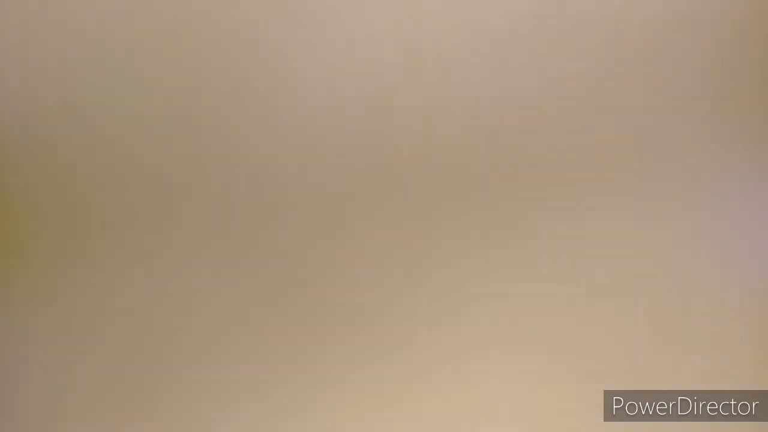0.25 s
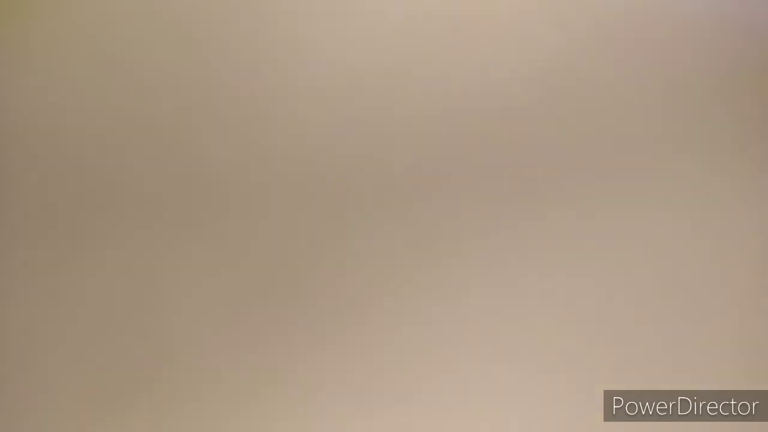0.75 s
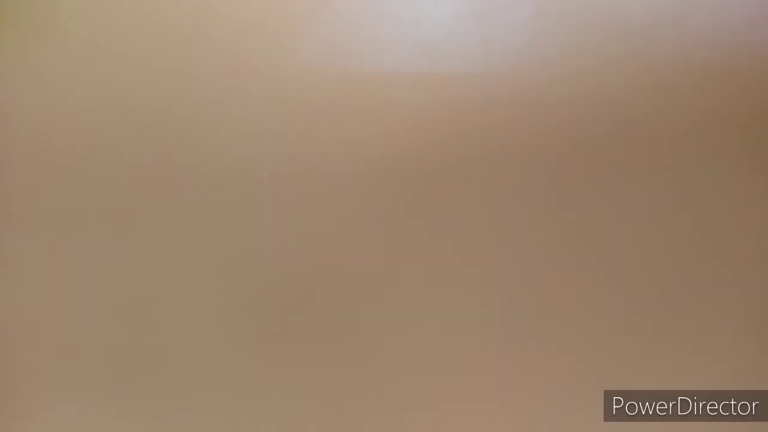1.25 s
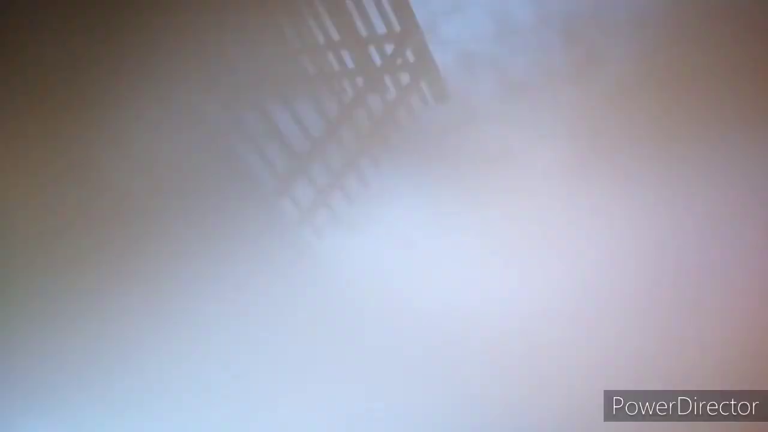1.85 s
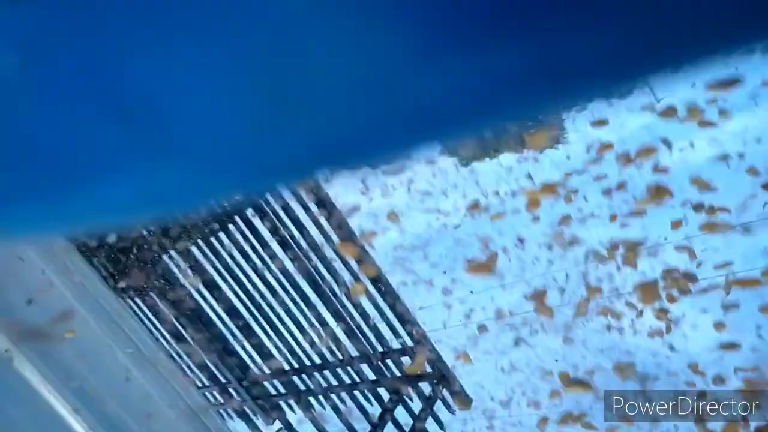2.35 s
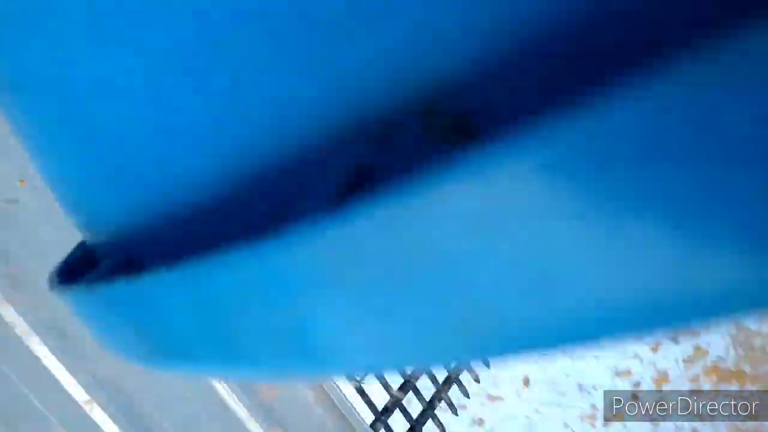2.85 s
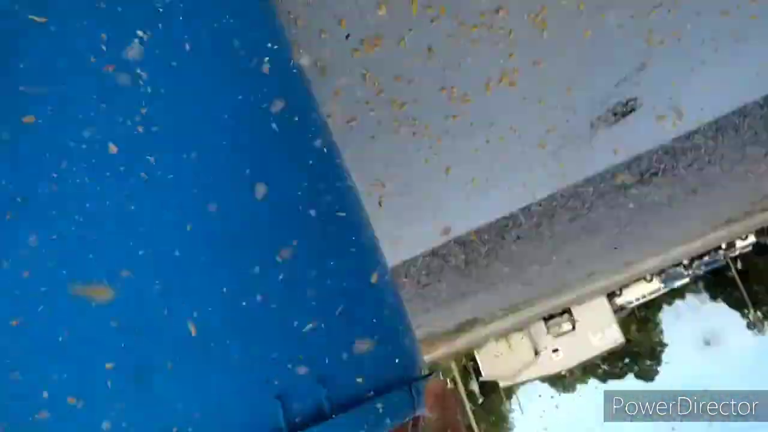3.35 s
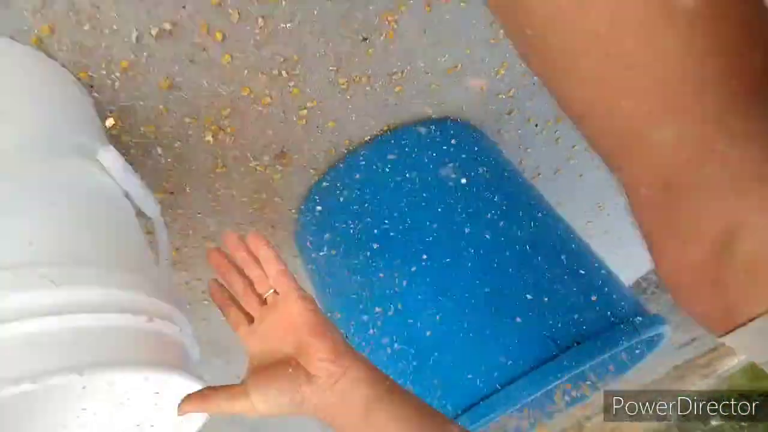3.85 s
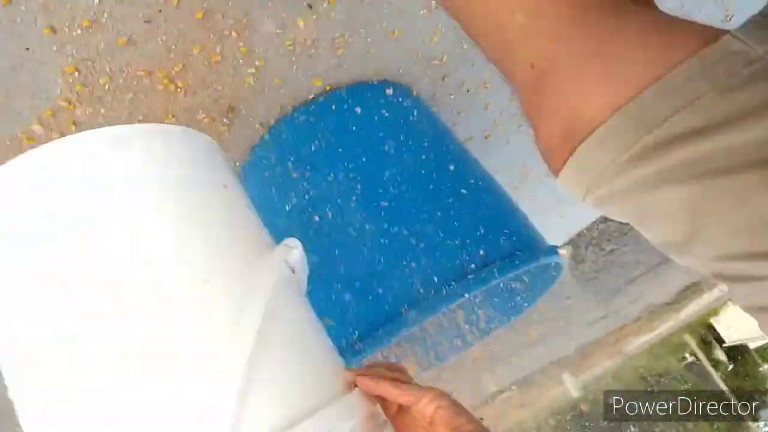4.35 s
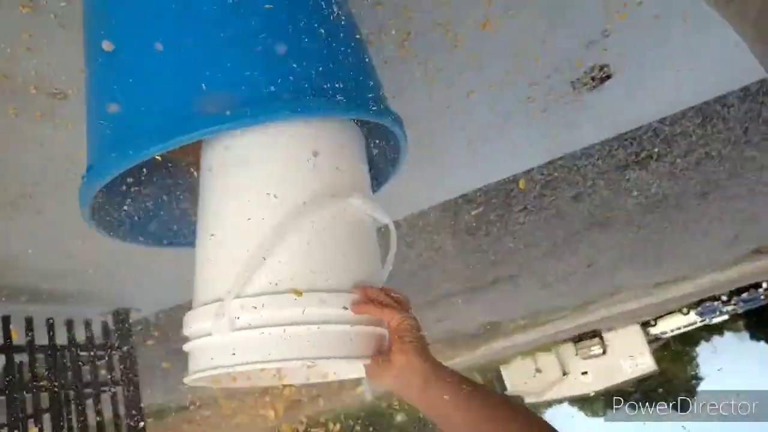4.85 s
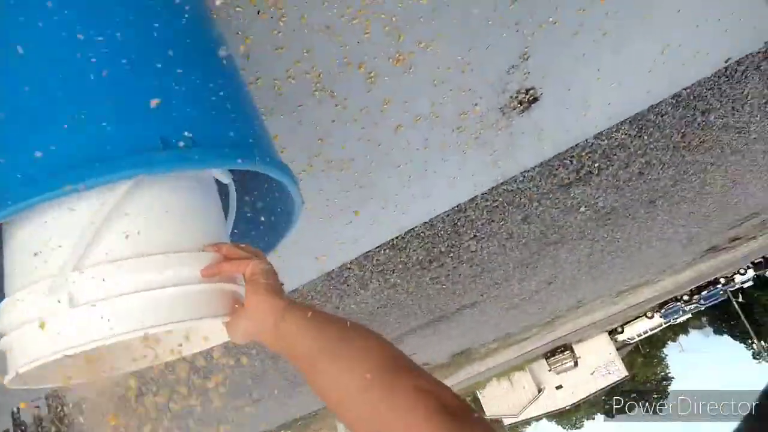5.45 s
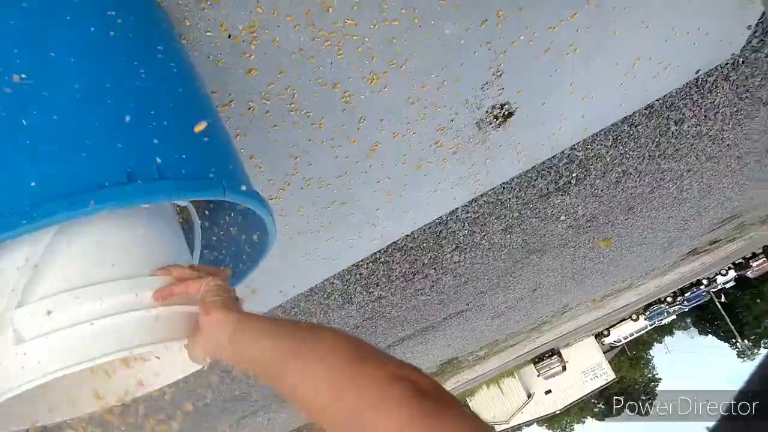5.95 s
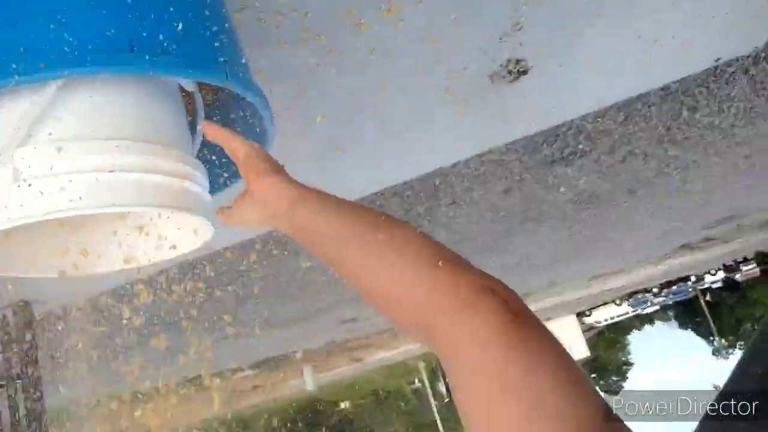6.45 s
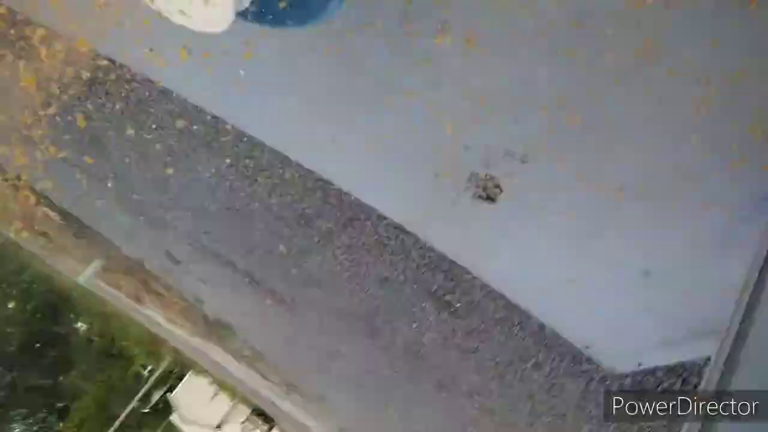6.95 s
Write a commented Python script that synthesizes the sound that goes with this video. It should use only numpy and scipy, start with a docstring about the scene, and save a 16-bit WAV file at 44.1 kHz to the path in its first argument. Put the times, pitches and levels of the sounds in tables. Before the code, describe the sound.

Close outdoor stream of hard kernels clattering on plastic, with sharp pings and handling bumps, then a booming bucket catching the flow and crackling brightly.

```python
"""Corn kernels stream from a chute onto a plastic tub, the concrete and then into a bucket held in the stream:
random clicks ring the modes of what they strike, single near kernels ping. The bucket booms, rings and ticks.
A handheld two-port recorder is turned about close by, so modes, balance and lag change with each pose.
Fingers bump its case (short low cycles); far off a motor hums (wavering sine) over yard rumble (banded noise)."""
import sys
import numpy as np
from scipy import signal
from scipy.io import wavfile

SR = 44100
rng = np.random.default_rng(int(sys.argv[2]) if len(sys.argv) > 2 else 0)


def generate_wav(sig):
    """Save sig (samples, or channels by samples) to the path in sys.argv[1] as 16-bit PCM at SR."""
    pcm = np.round(np.clip(np.atleast_2d(sig).T, -1, 1) * 32767).astype(np.int16)
    wavfile.write(sys.argv[1], SR, pcm)


N = 317077

# middles of the turns from pose to pose: (time [s])
TURNS_S = [1.47, 2.25, 3.27, 4.82]
TURN_LENGTH_S = 0.1


def from_db(db):
    """Gain of a level in dB."""
    return 10 ** (np.asarray(db) / 20)


def mid_one(x):
    """Scales so that the mean of both sides has rms 1."""
    mid = np.mean(x, axis=0)
    return x / np.sqrt(np.mean(mid ** 2) + 1e-20)


def in_time(rows):
    """Each column of a curve at every sample."""
    times_s, *columns = np.transpose(rows)
    t = np.arange(N) / SR
    return [np.interp(t, times_s, column) for column in columns]


def sides(pan_db):
    """Gains of left and right for a level difference, left minus right."""
    return from_db(np.array([pan_db / 2, -pan_db / 2])).reshape(2, -1)


def drift(rate_hz):
    """Slow noise of spread 1: two equal low-pass poles at rate_hz, run at SR / 20 and interpolated."""
    step, settle = 20, 4000
    r = np.exp(-2 * np.pi * rate_hz * step / SR)
    white = rng.standard_normal(N // step + settle + 2)
    slow = signal.lfilter([1], [1, -2 * r, r * r], white)[settle:]
    return np.interp(np.arange(N) / step, np.arange(len(slow)), slow / slow.std())


def resonance(x, hz, width_hz):
    """Two-pole peak of gain 1."""
    r = np.exp(-np.pi * width_hz / SR)
    zeros = np.array([1, 0, -1]) * (1 - r * r) / 2
    poles = [1, -2 * r * np.cos(2 * np.pi * hz / SR), r * r]
    return signal.lfilter(zeros, poles, x)


def hail(hits_per_s, size_db, channels):
    """Clicks at random moments, many small and few large; rms 1."""
    shape = (channels, N)
    over_smallest_db = size_db * np.minimum(rng.exponential(1, shape), 6)
    sizes = from_db(over_smallest_db) * rng.choice([-1, 1], shape)
    clicks = sizes * (rng.random(shape) < hits_per_s / SR)
    return clicks / clicks.std() + 1e-18


def stream():
    """Kernels land in clumps and ring what they strike; the ring of each pose fades into the next."""
    # modes of struck plastic, concrete and ports in each pose:
    # (frequency [Hz], width [Hz], relative level [dB], left minus right [dB])
    in_the_hand = [(650, 160, -1.5, 2), (886, 210, 0, -2.5), (982, 287, 1, -1), (1320, 340, 0, -1.5),
                   (2050, 2100, -4, 2.5), (2970, 220, 6, 4), (3900, 980, -5, 2), (6500, 2000, -2, -0.5),
                   (8350, 1900, -3, -3), (15100, 4400, -7.5, -3)]
    hand_opens = [(706, 500, -6.5, 9), (1100, 325, -0.5, 3.5), (1540, 540, -3, 3), (3020, 1200, 0.5, 5.5),
                  (5350, 4500, -2.5, 2.5), (14000, 7200, -8, -7)]
    behind_tub = [(528, 120, -8.5, 8), (761, 88, -1.5, 4), (1003, 78, -0.5, 7.5), (1241, 94, -1, -3),
                  (1490, 180, 2.5, 0.5), (2040, 840, 0, -1.5), (2980, 350, 4, 3), (3770, 380, 2.5, 8),
                  (5730, 1080, 1, 2.5), (8480, 1350, -2, -4.5), (14900, 1700, -5.5, 1)]
    over_tub = [(784, 111, 5, 5), (1040, 99, 5, 1), (1300, 660, -7, 4), (2860, 590, -5.5, 8.5),
                (4630, 3400, -11, 5.5), (8460, 2150, -7, 1.5), (15100, 6200, -13.5, 3)]
    at_bucket = [(870, 450, -2, -2), (1073, 134, 0.5, 0.5), (1388, 126, -3, 1), (1667, 260, -2, -2),
                 (2100, 420, -3, 3), (3170, 1470, -5, 4), (5100, 650, 1, 1), (6430, 1400, -5, 1),
                 (8350, 2660, -8.5, -1.5), (15100, 6300, -19, 3.5)]
    poses = [in_the_hand, hand_opens, behind_tub, over_tub, at_bucket]
    # delay of shared sound at the right port, one per pose: (lag [samples])
    right_lags = [4, 0, -5, 9, 9]
    # where the stream lies as the recorder swings: (time [s], left minus right [dB])
    swing = [(0.0, -3), (1.06, -0.5), (1.88, -7), (2.24, 2.0), (4.54, -9.5), (4.98, -1), (7.19, 0.0)]
    # share of the pour heard as separate near hits, the rest is even hiss: (time [s], share [0-1])
    coarse_share = [(2.2, 1.0), (3.74, 0.9), (3.84, 0.55), (7.19, 0.7)]
    hits_per_s, size_db, clump_db, flutter_db = 6000, 3.1, 1.4, 1.5

    rattle_db, hollow_db = pour_levels()
    pan_db, = in_time(swing)
    coarse, = in_time(coarse_share)
    clumps = from_db(coarse * clump_db * (0.5 * drift(15) + drift(85)))
    clumps = clumps / np.sqrt(np.mean(clumps ** 2))
    # kernels land on other spots from moment to moment, so modes are struck harder or softer in turn
    flutter = from_db([coarse * flutter_db * drift(44) for _ in range(5)])
    clicks = hail(hits_per_s, size_db, channels=4)
    spray = rng.standard_normal((2, N))
    hits = np.sqrt(coarse) * clicks + np.sqrt(1 - coarse) * rng.standard_normal(clicks.shape)

    t, out = np.arange(N) / SR, np.zeros((2, N))
    edges = [-1, *TURNS_S, N / SR + 1]
    for k, (modes, lag, start, end) in enumerate(zip(poses, right_lags, edges, edges[1:])):
        share = np.clip(np.minimum(t - start, end - t) / TURN_LENGTH_S + 0.5, 0, 1)
        on = share > 0
        # other kernels are heard in each pose
        shared, *own = np.roll(hits, k, axis=0)[:3, on] * clumps[on]
        both = np.array([shared, np.roll(shared, lag)])
        pose_spray = np.roll(spray, k, axis=0)[:, on]
        hollow, rattle = ringing(modes, both, np.array(own), pose_spray, flutter[:, on])
        poured = from_db(hollow_db[on]) * mid_one(hollow) + from_db(rattle_db[on]) * mid_one(rattle)
        out[:, on] += np.sqrt(share[on]) * poured * sides(pan_db[on])
    return out


def pour_levels():
    """Rattle and hollow ring in dB: the flow, with every slug swelling and falling back alike."""
    # flow between slugs: (time [s], rattle [dB], hollow ring of the plastic against the rattle [dB])
    flow = [(0, -21.5, -7.5), (0.65, -19.5, -7.0), (1.35, -20.5, -7.5), (1.53, -23.0, -8.0),
            (1.9, -20.5, -9.5), (2.16, -25.0, -11.5), (2.36, -19.0, -6.5), (2.82, -16.5, -8.5),
            (3.05, -20.0, -8.0), (3.26, -20.5, -4.0), (3.63, -20.5, -7.5), (3.8, -24.0, -6.5),
            (4.17, -24.5, -9.0), (4.74, -24.5, -8.5), (4.93, -14.5, -13.0), (5.25, -16.0, -12.0),
            (5.7, -16.0, -18.5), (6.6, -17.0, -19.0), (6.98, -17.0, -17.0), (7.19, -16.5, -13.0)]
    # crests of denser slugs of kernels: (time [s], rattle over the flow [dB])
    slugs = [(0.01, 3.5), (0.19, 2.5), (0.29, 2.0), (0.515, 2.5), (0.73, 2.0), (0.95, 2.5), (1.14, 2.5),
             (1.235, 2.0), (1.41, 3.5), (1.62, 3.5), (1.76, 3.5), (2.015, 2.0), (2.11, 4.0), (2.21, 3.0),
             (2.98, 2.0), (3.12, 3.0), (3.305, 2.0), (3.48, 3.5), (3.57, 3.5), (3.7, 5.5), (3.855, 2.0),
             (4.04, 3.5), (4.305, 3.0), (4.505, 2.5), (5.185, 2.5), (5.6, 1.5), (5.93, 1.5), (6.26, 2.0),
             (6.72, 2.0), (6.96, 1.5)]
    rise_s, fall_s = 0.06, 0.09
    hollow_follows = 1.3   # dB of hollow ring per dB of slug

    t = np.arange(N) / SR
    flow_db, hollow_db = in_time(flow)
    slug_db = sum(np.interp(t, [s - rise_s, s, s + fall_s], [0, db, 0]) for s, db in slugs)
    return flow_db + slug_db, flow_db + hollow_db + hollow_follows * slug_db


def ringing(modes, shared, own, spray, flutter):
    """Hits through the modes of a pose, split into hollow ring and rattle; long waves reach both ports alike."""
    alike_below_hz, hollow_top_hz = 1080, 1300
    # part of the treble that is fine even spray of chaff and far kernels
    spray_above_hz, spray_share = 7500, 0.26

    hollow, rattle = 0, 0
    for k, (hz, width_hz, level_db, pan_db) in enumerate(modes):
        alike = 0.75 / (1 + (hz / alike_below_hz) ** 4)
        blows = (np.sqrt(alike) * shared + np.sqrt(1 - alike) * own) * flutter[k % len(flutter)]
        if hz > spray_above_hz:
            blows = np.sqrt(1 - spray_share) * blows + np.sqrt(spray_share) * spray
        sign = (-1) ** k
        ring = sign * from_db(level_db) * sides(pan_db) * resonance(blows, hz, width_hz)
        if hz < hollow_top_hz:
            hollow = hollow + resonance(ring, hz, 6.6 * width_hz)   # steeper skirts
        else:
            rattle = rattle + ring
    return hollow, rattle


def filling(pour):
    """The rising heap damps the bucket wall, so a band of the rattle gradually weakens."""
    start_s, full_damping_s = 5.6, 2.7
    damped = np.clip((np.arange(N) / SR - start_s) / full_damping_s, 0, 1)
    return pour - damped * resonance(pour, 3440, 1140)


def knocks():
    """Near kernels ping, gritty and falling: a bending wave spreads out, highs come first, lows last."""
    # single kernels close to the ports:
    # (time [s], nominal peak of the louder side [dB], middle pitch [Hz], left minus right [dB])
    kernels = [(0.5712, -6, 2900, 4), (1.018, -6, 3200, 1), (1.6217, -5, 2900, 10), (2.0666, -1, 3900, 7),
               (2.0802, -7, 4500, 5), (2.1214, -5.5, 5800, 2), (2.1832, -8.5, 3500, 0),
               (2.185, -4, 5200, -9), (2.188, -7, 3700, 8), (2.2062, -10, 4000, 3), (2.2108, -5, 4500, 9),
               (2.2165, -10, 4500, 0), (2.2398, -7, 4000, 9), (2.2685, -10, 7000, 2), (3.7115, -5, 6000, 3)]
    length_s, fall_octaves, grit_share = 0.0024, 2.4, 0.45

    out, grit = np.zeros((2, N)), rng.standard_normal((2, N))
    progress = np.linspace(0, 1, round(length_s * SR))
    for s, peak_db, middle_hz, pan_db in kernels:
        i = round(s * SR)
        span = slice(i, i + len(progress))
        pitch_hz = middle_hz * 2 ** (fall_octaves * (0.5 - progress))
        turn = 2 * np.pi * np.cumsum(pitch_hz) / SR + rng.uniform(0, 2 * np.pi)
        ping = np.sin(np.pi * progress) * (np.sin(turn) + grit_share * grit[:, span])
        out[:, span] += from_db(peak_db - abs(pan_db) / 2) * sides(pan_db) * ping
    return out


def bucket_boom():
    """Hail and soft thumps drive the bucket's air and floor modes: swells, holds, dies as it fills."""
    # low modes of the bucket: (frequency [Hz], width of the first of two passes [Hz], relative level [dB])
    bucket_modes = [(203, 38, -1.5), (256.5, 21, -4), (420, 85, -3), (473, 62, -4)]
    # heavier soft thumps on the bucket floor: (time [s], relative strength of the blow [dB])
    thumps = [(5.025, 39.5), (5.3, 40.5), (5.465, 40), (5.63, 44), (5.79, 42), (6.245, 42)]
    thump_contact_s = 0.004
    start_s, rise_s, hold_s, level_db, fade_db_per_s = 4.79, 0.19, 0.7, -27.5, 11.5

    mid, side = hail(1500, 2.1, channels=2)
    push = np.hanning(round(thump_contact_s * SR))
    for s, db in thumps:
        mid[round(s * SR):][:len(push)] += from_db(db) * push / push.sum()
    blows = mid + 0.14 * side * np.array([[1], [-1]])
    boom = 0
    for hz, width_hz, db in bucket_modes:
        once = resonance(blows, hz, width_hz)
        boom = boom + from_db(db) * resonance(once, hz, 0.97 * width_hz)
    since_s = np.arange(N) / SR - start_s
    swell = np.clip(since_s / rise_s, 0, 1) ** 2
    fade_db = fade_db_per_s * np.clip(since_s - rise_s - hold_s, 0, None)
    return swell * from_db(level_db - fade_db) * mid_one(boom)


def bucket_ring():
    """One gliding mode of the empty bucket: slow random swells carried on its moving pitch."""
    # the bucket swings into the stream: (time [s], pitch [Hz], level [dB])
    swinging_in = [(4.8, 1300, -36), (4.94, 1473, -25), (5.12, 1690, -26.5), (5.3, 1646, -33)]
    hz, level_db = in_time(swinging_in)
    turn, t = 2 * np.pi * np.cumsum(hz) / SR, np.arange(N) / SR
    ring = np.array([drift(52) * np.cos(turn) + drift(58) * np.sin(turn) for _ in range(2)])
    on = (t > swinging_in[0][0]) * (t < swinging_in[-1][0])
    return on * from_db(level_db) * mid_one(ring)


def ticks():
    """Kernels crack on kernels: sparse noise bursts of a few ms in the bright modes of the heap."""
    # cracking as the bucket fills: (time [s], level [dB])
    crack_levels = [(4.9, -31), (6.3, -25), (6.75, -20.5)]
    level_db, = in_time(crack_levels)
    decay_s = 0.0011
    fade = np.exp(-1 / (decay_s * SR))
    bursts = signal.lfilter([1], [1, -fade], np.abs(hail(200, 2.4, channels=1)))
    sprayed = bursts * rng.standard_normal((2, N))
    cracks = resonance(resonance(sprayed, 5200, 1000), 5600, 1800)
    on = np.arange(N) / SR > crack_levels[0][0]
    return on * from_db(level_db) * mid_one(cracks)


def bumps():
    """Fingers bump the case: a few low cycles with an overtone that swell in a moment and die."""
    # bumps: (time [s], level before the swell [dB], pitch [Hz], decay by 60 dB [s], left minus right [dB])
    finger_bumps = [(2.143, -11, 110, 0.02, -10), (2.184, -19, 99.6, 0.023, -13),
                    (2.2345, -14, 90, 0.03, 7), (2.24, -9, 500, 0.02, 3), (2.241, -10.5, 185, 0.05, 0),
                    (3.1, -21, 84.5, 0.028, 14)]
    out, t = np.zeros((2, N)), np.arange(SR // 8) / SR
    swell = 1 - np.exp(-t / 0.0012)
    for s, level_db, hz, t60_s, pan_db in finger_bumps:
        i = round(s * SR)
        overtone = 0.54 * np.exp(-t / 0.006) * np.sin(2 * np.pi * 3.2 * hz * t)
        cycles = np.sin(2 * np.pi * hz * t) + overtone
        out[:, i:i + len(t)] += sides(pan_db) * from_db(level_db - 60 * t / t60_s) * cycles * swell
    return out


def motor():
    """Far motor: a low sine that wavers a little in pitch and level."""
    hum_db, _ = by_pose()
    pitch_hz = 70.5 + 0.6 * drift(2.2)
    waver = from_db(1.2 * drift(6))
    hum = np.sqrt(2) * waver * np.sin(2 * np.pi * np.cumsum(pitch_hz) / SR)
    return from_db(hum_db) * hum * sides(1.7)


def yard_rumble():
    """Dull rumble of the far yard: noise weighted in half-octave bands, mostly alike on both sides."""
    # rumble spectrum: (frequency [Hz], relative density [dB per Hz])
    spectrum = [(30, -17), (100, -5.5), (160, -6.5), (300, -9.5), (600, -10.5)]
    _, rumble_db = by_pose()
    spectrum_hz, density_db = np.transpose(spectrum)
    white = rng.standard_normal((2, 2, N))
    rumble = 0
    for k, low_hz in enumerate(30 * 2 ** np.arange(0, 4.5, 0.5)):
        band = signal.butter(2, [low_hz, low_hz * np.sqrt(2)], "band", fs=SR, output="sos")
        mid, side = signal.sosfilt(band, white[k % 2])   # neighbouring bands use separate noise
        middle_hz = low_hz * 2 ** 0.25
        gain = from_db(np.interp(np.log(middle_hz), np.log(spectrum_hz), density_db))
        rumble = rumble + gain * (mid + 0.29 * side * np.array([[1], [-1]]))
    return from_db(rumble_db) * mid_one(rumble)


def by_pose():
    """Hum and rumble levels in dB at every sample, gliding through the turns."""
    # the far yard, one row per pose: (motor hum [dB], rumble [dB])
    pose_levels = [(-44, -38.5), (-43, -39.5), (-52.5, -45), (-45, -42.5), (-52, -48.5)]
    times_s = np.add.outer(TURNS_S, [-TURN_LENGTH_S / 2, TURN_LENGTH_S / 2]).ravel()
    return in_time(np.column_stack([times_s, np.repeat(pose_levels, 2, axis=0)[1:-1]]))


def scene():
    """All sources at the two ports."""
    near = filling(stream()) + knocks()
    bucket = bucket_boom() + bucket_ring() + ticks()
    return near + bucket + bumps() + motor() + yard_rumble()


def record(dry):
    """The microphones lose the deepest bass, peaks are rounded, the top is cut."""
    low_cut_hz, top_cut_hz, ceiling = 59.6, 15850, 0.92
    thin = signal.sosfilt(signal.butter(2, low_cut_hz, "high", fs=SR, output="sos"), dry)
    rounded = ceiling * np.tanh(thin / ceiling)
    return signal.sosfilt(signal.cheby2(20, 80, top_cut_hz, fs=SR, output="sos"), rounded)


dry = scene()
out = record(dry)
generate_wav(out)
```